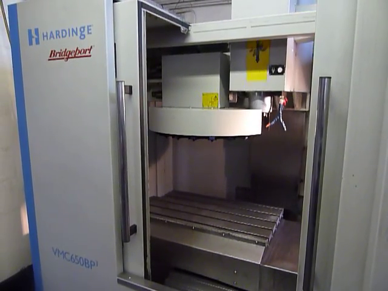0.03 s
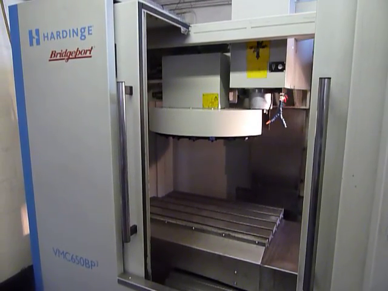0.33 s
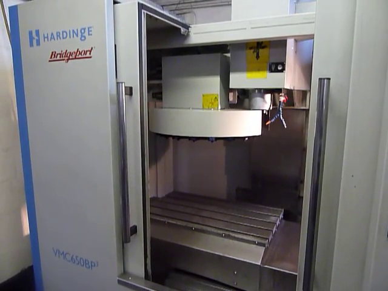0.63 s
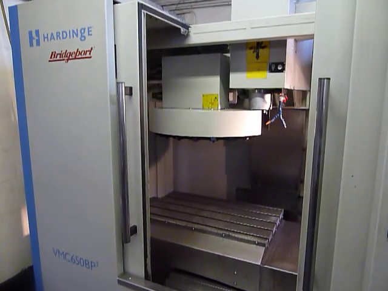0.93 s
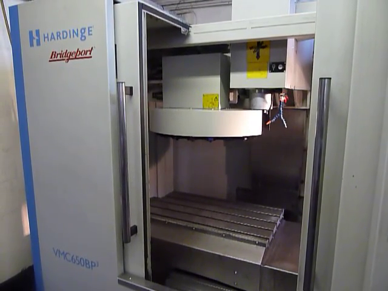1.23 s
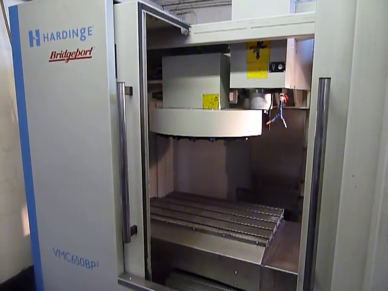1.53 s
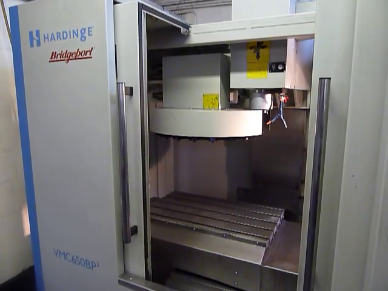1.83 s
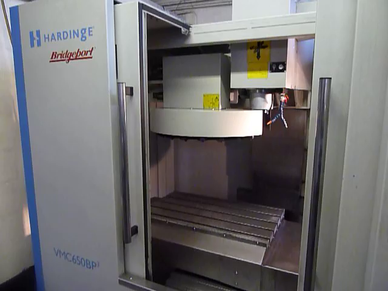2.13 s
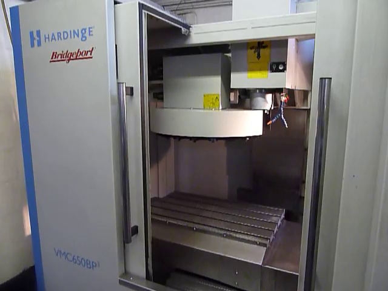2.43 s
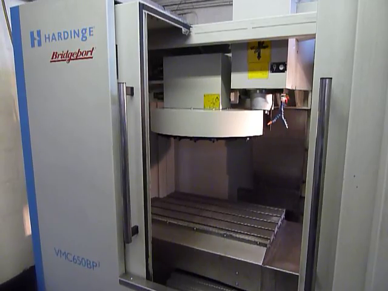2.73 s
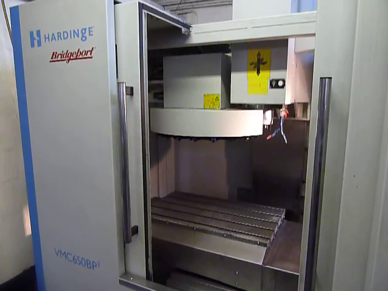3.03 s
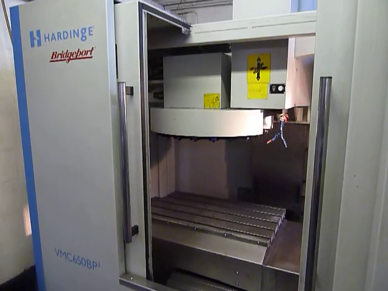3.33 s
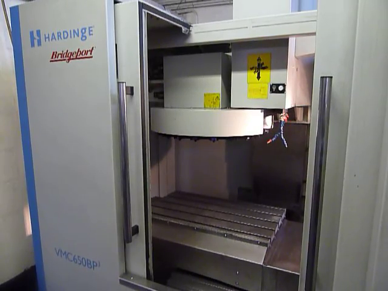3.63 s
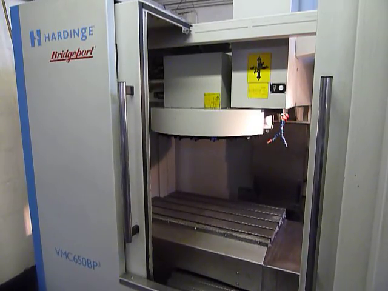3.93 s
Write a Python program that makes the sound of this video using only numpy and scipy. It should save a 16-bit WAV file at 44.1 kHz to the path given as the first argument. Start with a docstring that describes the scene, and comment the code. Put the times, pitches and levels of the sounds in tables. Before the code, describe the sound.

Compressed air rushes steadily through a milling machine's spindle from the start, hollow and hissing, with several breathy whistles that swell slightly. Behind it a pump drones with a light throb and cooling fans rush inside the metal enclosure. At about 3.1 seconds the air's tone shifts and the whistles change pitch. At 3.7 seconds the air shuts off quickly, leaving the pump and fans until about 4 seconds.

```python
"""A whistling rush of compressed air, blown through the hollow spindle of a machining centre and ringing
its pipe resonances. The place is a workshop, with a stereo microphone pair outside the machine's open
door. Behind the air a pump drones and cooling fans rush. As the head comes down, about 3.1 s in, the
resonances shift a little and the whistles change; at 3.7 s the air shuts off and leaves the drone."""
import sys
import numpy as np
from scipy import signal
from scipy.fft import rfft, irfft
from scipy.io import wavfile
from scipy.ndimage import uniform_filter1d

SR = 44100
rng = np.random.default_rng(int(sys.argv[2]) if len(sys.argv) > 2 else 0)


def pcm_store(signal):
    """Save signal as 16-bit PCM."""
    levels = np.round(np.clip(np.atleast_2d(signal), -1, 1) * 32767)
    wavfile.write(sys.argv[1], SR, levels.astype(np.int16).T)


N = 176400
T = np.arange(N) / SR
HZ = np.fft.rfftfreq(N, 1 / SR)


def amp(db):
    """Decibels to gain."""
    return 10 ** (np.asarray(db) / 20)


def unit_rms(x):
    """Scales to rms 1."""
    return x / np.sqrt(np.mean(x ** 2) + 1e-20)


def over_time(points):
    """A time table joined by straight lines."""
    return np.interp(T, *np.transpose(points))


def over_frequency(points):
    """A frequency table joined on a log axis."""
    hz, value = np.transpose(points)
    return np.interp(np.log(HZ + 1), np.log(hz + 1), value)


def low_cut(corner_hz, order=4):
    """Gain of a steep high-pass at every frequency."""
    ratio = (HZ / corner_hz) ** order
    return ratio / np.hypot(1, ratio)


def drift(rate_hz):
    """A random wander of rms 1, up to about the given rate."""
    t = np.linspace(0, N / SR, 1024)
    hz = np.fft.rfftfreq(len(t), t[1])
    slow = rfft(rng.standard_normal(len(t))) / (1 + (hz / rate_hz) ** 4)
    return np.interp(T, t, unit_rms(irfft(slow)))


def tone(cycles, db, start_rad, waver_db=0.34, waver_hz=4.6, wobble_rad=0.047):
    """A nearly steady sine that wavers slightly in level and phase."""
    peak = np.sqrt(2) * amp(db + waver_db * drift(waver_hz))
    return peak * np.sin(2 * np.pi * cycles + start_rad + wobble_rad * drift(waver_hz))


def turbulence(density, patchy_db):
    """Two unrelated noises with the given amplitude per root Hz, churning in short patches."""
    frames = dict(nperseg=512, noverlap=384)
    cells = signal.stft(rng.standard_normal((2, N)), **frames)[2]
    patches = uniform_filter1d(rng.standard_normal(cells.shape[1:]), size=6, axis=0)  # across frequency
    patches = uniform_filter1d(patches, size=10, axis=1)  # across time
    churn = signal.istft(cells * amp(patchy_db * unit_rms(patches)), **frames)[1][:, :N]
    return irfft(rfft(unit_rms(churn)) * density * np.sqrt(SR / 2), N)


def enclosure(x, t60_s=.35, reflected_db=-4):
    """Dense reflections between the sheet-steel walls give the rush a fine hollow grain."""
    t = T[:SR // 2]
    tail = rng.standard_normal((2, len(t))) * amp(-60 * t / t60_s)
    tail /= np.linalg.norm(tail, axis=1, keepdims=True)
    already_running = np.pad(x, ((0, 0), (len(t) - 1, 0)), mode="reflect")
    reflections = signal.fftconvolve(already_running, tail, "valid", axes=1)
    return (x + amp(reflected_db) * reflections) / np.hypot(1, amp(reflected_db))


# How alike the rush is at the two microphones (frequency [Hz], coherence [0..1])
MIC_COHERENCE = [(300, .99), (950, .96), (1600, .82), (2700, .8), (4600, .68), (6200, .85), (7500, .99)]

def stereo_spread(pair):
    """Blends two unrelated noises into partly alike left and right channels."""
    angle = np.arccos(np.clip(over_frequency(MIC_COHERENCE), 0, 1)) / 2
    mid, side = rfft(pair) * np.array([np.cos(angle), np.sin(angle)])
    return irfft(np.array([mid + side, mid - side]), N)


# Fans and workshop room tone (frequency [Hz], density [dB per Hz])
FAN_RUSH = [(20, -98), (45, -83.5), (65, -80.5), (85, -81.5), (120, -73), (162, -68), (205, -68.5),
            (265, -66), (330, -66.5), (480, -67.5), (560, -59.5), (650, -57), (800, -64), (1200, -62),
            (1900, -66.5), (2500, -62), (3400, -65.5), (4400, -62.5), (5300, -65.5), (5950, -63),
            (6500, -67.5), (6800, -74.5), (7300, -75.5), (7900, -79.5)]
# Blade tones of the two fans (frequency [Hz], relative level [dB])
BLADE_TONES = [(229, -49), (235, -43.5)]
# Swell of the blade tones (time [s], gain [dB])
BLADE_SWELL = [(0, 2), (1.5, -1), (2.8, 0.5), (3.4, 3), (4, 6)]

def cooling_fans():
    """The background: two fans rush in the enclosure, their blade tones beating against the pump."""
    blades = sum(tone(hz * T, db, 2 * np.pi * rng.random()) for hz, db in BLADE_TONES)
    rush = turbulence(amp(over_frequency(FAN_RUSH)), patchy_db=1.25)
    return stereo_spread(enclosure(rush)) + blades * amp(over_time(BLADE_SWELL))


# Pump shaft (time [s], speed [turns per second])
SHAFT_SPEED = [(0, 45.42), (2.2, 45.43), (3.0, 45.455), (4, 45.465)]
# Pump harmonics (order [multiple of shaft speed], relative level [dB])
PUMP_TONES = [(2, -50.5), (3, -44.0), (4, -54.5), (5, -51), (6, -41), (7, -38.7), (8, -37.5), (9, -36.5),
              (10, -45.5), (11, -42.5), (12, -36), (13, -40.5), (14, -35), (15, -47), (16, -42.1),
              (17, -51), (18, -50.5), (19, -40), (20, -42.5), (22, -47), (23, -55.5), (24, -44),
              (25, -48.5), (26, -46), (27, -43), (28, -43.5), (29, -60.5), (30, -44.5), (31, -44.6),
              (33, -49.3), (34, -47.5), (35, -43.5), (36, -46.5), (39, -57)]
# Side tones of a part turning once in five shaft turns
# (order [multiple of shaft speed], relative level [dB])
PUMP_THROB = [(6.8, -49.5), (7.2, -49.5), (7.8, -45), (8.2, -48.5), (8.8, -54), (11.8, -44.5),
              (12.2, -48.5), (12.4, -49.5), (15.8, -51), (16.2, -50), (19.2, -47), (21.2, -46.5)]
# Swell of the drone (time [s], gain [dB])
PUMP_SWELL = [(0, .5), (.6, 0), (1.5, 0), (3.4, -1), (4, 1.4)]

def pump(scatter_rad=.55):
    """A pump making two strokes a turn drones near the centre of the image; side tones make it throb."""
    turns = np.cumsum(over_time(SHAFT_SPEED)) / SR
    drone = np.zeros(N)
    for order, db in PUMP_TONES:
        stroke_rad = order % 2 * np.pi / 2  # odd and even orders a quarter cycle apart
        drone += tone(order * turns, db, stroke_rad + scatter_rad * rng.standard_normal())
    for order, db in PUMP_THROB:
        drone += tone(order * turns, db, 2 * np.pi * rng.random())
    return drone * amp(over_time(PUMP_SWELL))


# How strongly the whistles speak (time [s], gain [dB])
WHISTLE_SWELL = [(0, 0), (.45, 2.5), (.75, 1.5), (1.0, 3), (1.35, 0), (1.7, 2), (2.0, -1), (2.3, 1.5),
                 (2.65, 1.5), (3.0, 0.5), (3.09, 0), (3.2, 1.5), (3.45, 2), (3.7, -0.5)]

def spindle_bore(resonances, whistles, rush_db, cutoff_hz=540, patchy_db=0.45):
    """Turbulent air rings the bore's broad pipe resonances and narrow whistles; little bass passes."""
    density = amp(over_frequency(resonances) + rush_db) * low_cut(cutoff_hz)
    rush = enclosure(turbulence(density, patchy_db))
    whistle_power = sum(amp(db) ** 2 * 2 / (np.pi * width) / (1 + ((HZ - hz) / width) ** 2) ** 2
                        for hz, width, db in whistles)
    return rush + amp(over_time(WHISTLE_SWELL)) * turbulence(np.sqrt(whistle_power), patchy_db)


# Pipe resonances, head up and head down (frequency [Hz], relative density [dB per Hz])
PIPE_HEAD_UP = [(450, -82.5), (650, -56), (790, -73), (920, -56.5), (1080, -50), (1230, -57.5),
                (1330, -67.5), (1900, -66.5), (2250, -59), (2550, -54.5), (2800, -61.5), (3200, -70.2),
                (3750, -65), (3950, -62), (4500, -59), (5080, -61), (5350, -73.5), (5750, -67),
                (6150, -56.5), (6500, -59), (6850, -60.5), (7200, -73.5), (7700, -99), (8100, -76)]
PIPE_HEAD_DOWN = [(450, -79), (650, -57), (790, -72), (1000, -50), (1150, -49.5), (1330, -65), (1900, -65),
                  (2350, -57.5), (2750, -54), (3200, -68.5), (3800, -66.7), (4550, -56.5), (5080, -60),
                  (5350, -78.5), (5750, -72), (6250, -55.5), (6900, -63), (7250, -75), (7700, -95),
                  (8100, -69.5)]
# Breathy whistles, head up and head down (frequency [Hz], width [Hz], relative level [dB])
WHISTLES_HEAD_UP = [(914, 6.9, -41), (1148, 18, -34), (1223, 9.5, -34.5), (2373, 14, -43), (2450, 12, -35),
                    (2573, 9, -40.5), (2675, 10, -37.5), (2980, 6.6, -46), (3060, 5, -48), (3630, 39, -45),
                    (4385, 23, -44.5), (4690, 8.7, -42.5), (4935, 7.3, -39.5), (6150, 12, -43.5),
                    (6150, 11, -42.5), (6306, 65, -35.5), (7330, 8.5, -55)]
WHISTLES_HEAD_DOWN = [(1160, 33, -39), (2330, 20, -33.5), (3500, 25, -42), (4340, 14, -40), (4500, 14, -42),
                      (4500, 25, -41), (6200, 33, -46)]
# Strength of the air flow (time [s], gain [dB])
AIR_FLOW = [(0, 2), (.5, 2.07), (1.0, 1.46), (1.45, 1), (2.0, 1.65), (2.35, 1.2), (2.6, 2), (2.95, 2.2),
            (3.25, 1.8), (3.5, 0), (3.7, -0.7)]

def air_blast(leave_s=3.07, arrive_s=3.11, fade_s=0.2, shut_s=3.704, shut_db_per_s=118, flutter_db=0.33):
    """The foreground: the blast changes colour as the head comes down and dies when the valve shuts."""
    fade_out = np.sin(np.clip((leave_s - T) / fade_s + .5, 0, 1) * np.pi / 2)
    fade_in = np.sin(np.clip((T - arrive_s) / fade_s + .5, 0, 1) * np.pi / 2)
    head_up = spindle_bore(PIPE_HEAD_UP, WHISTLES_HEAD_UP, rush_db=-0.66)
    head_down = spindle_bore(PIPE_HEAD_DOWN, WHISTLES_HEAD_DOWN, rush_db=-0.05)
    air = fade_out * head_up + fade_in * head_down
    valve_db = -shut_db_per_s * np.maximum(T - shut_s, 0)
    flow_db = over_time(AIR_FLOW) + valve_db + flutter_db * drift(rate_hz=25)
    return stereo_spread(air * amp(flow_db))


def scene():
    """At the open door: air and fans inside the enclosure, over the pump drone."""
    return air_blast() + cooling_fans() + pump()


# Phase between the microphones (frequency [Hz], left lead [rad])
MIC_LEAD = [(0, 0), (100, -.05), (400, -.25), (1640, -.62), (3270, -.7), (5080, -.58), (6370, -.45),
            (8000, 0)]
# Balance of the pair (frequency [Hz], left minus right [dB])
MIC_BALANCE = [(60, -1.0), (100, -1.0), (180, -1.0), (310, -1.0), (540, -1.4), (930, -1.5), (1600, -1.2),
               (2770, -2.0), (4780, -0.5), (8270, -1.0)]

def record(dry, low_cut_hz=26, top_hz=7950):
    """The two microphones differ in phase and level, and lose the deepest bass and the top treble."""
    left = np.exp(.5j * over_frequency(MIC_LEAD)) * amp(over_frequency(MIC_BALANCE) / 2)
    right = 1 / left
    heard = irfft(rfft(dry) * np.array([left, right]) * low_cut(low_cut_hz), N)
    low_pass = signal.firwin(151, top_hz, window=("kaiser", 9), fs=SR)
    return signal.oaconvolve(heard, low_pass[None], "same", axes=1)


dry = scene()
out = record(dry)
pcm_store(out)
```